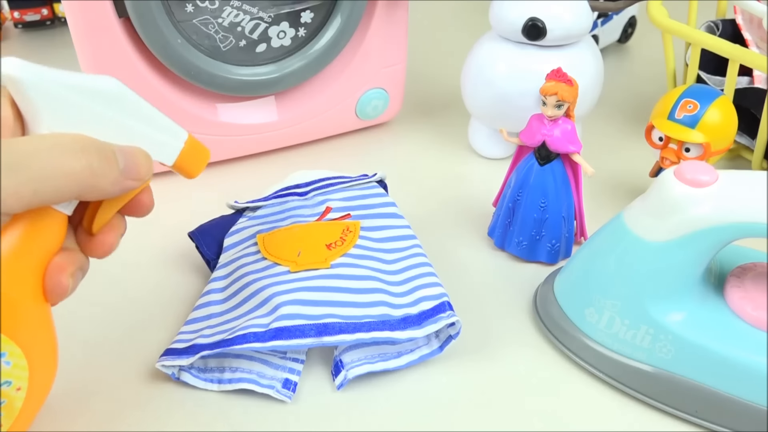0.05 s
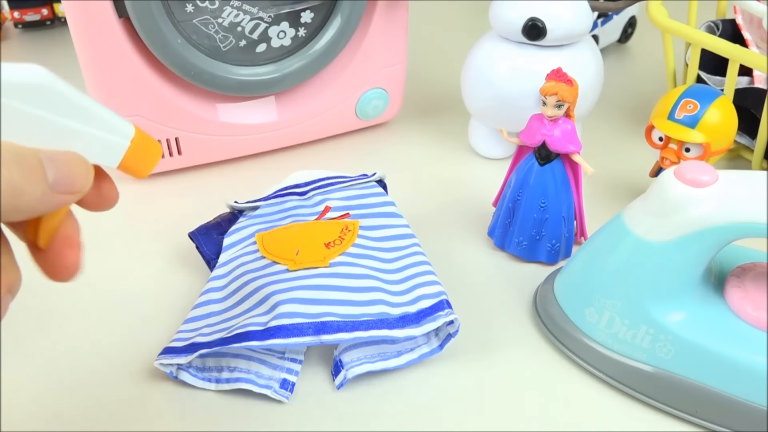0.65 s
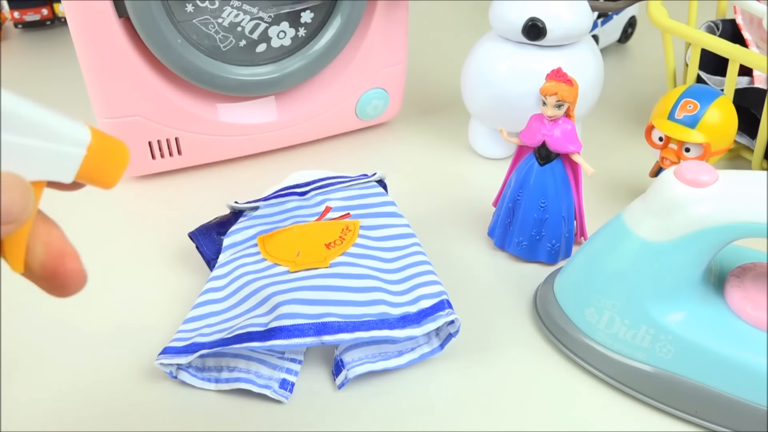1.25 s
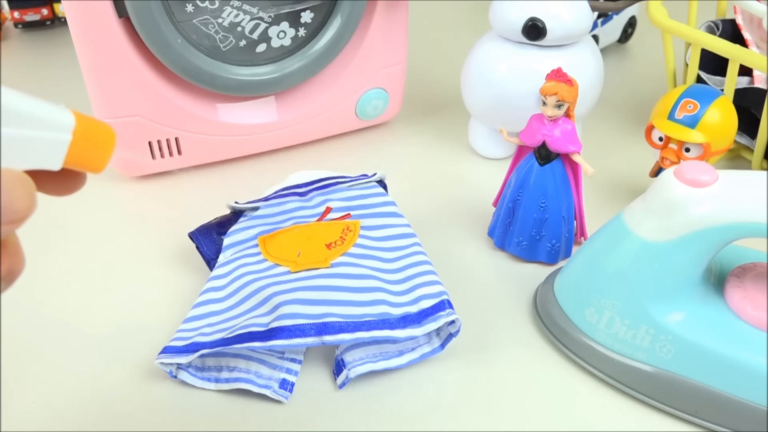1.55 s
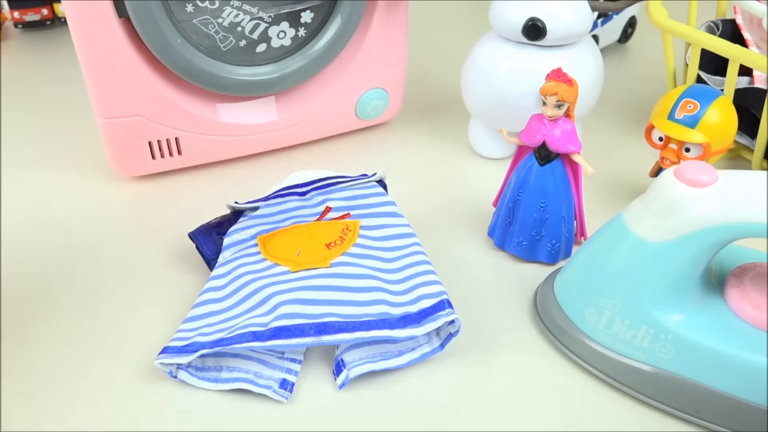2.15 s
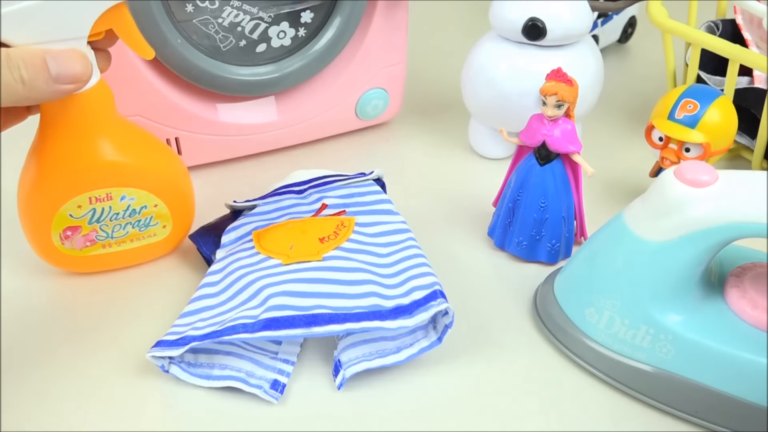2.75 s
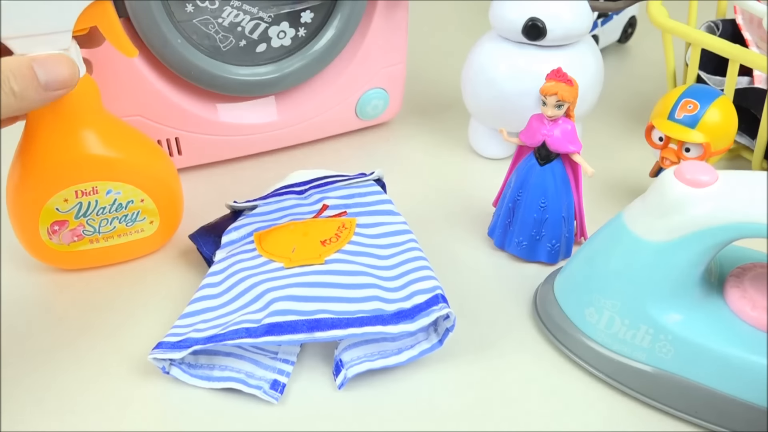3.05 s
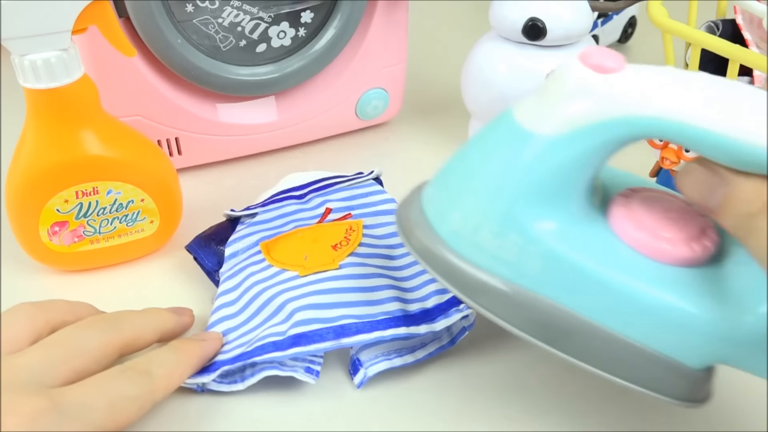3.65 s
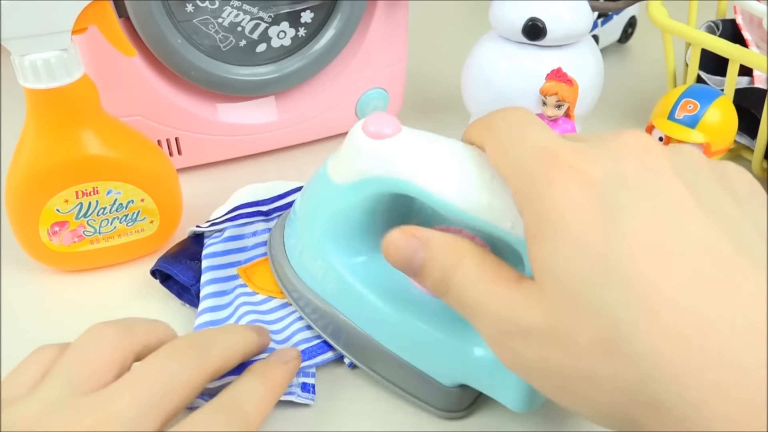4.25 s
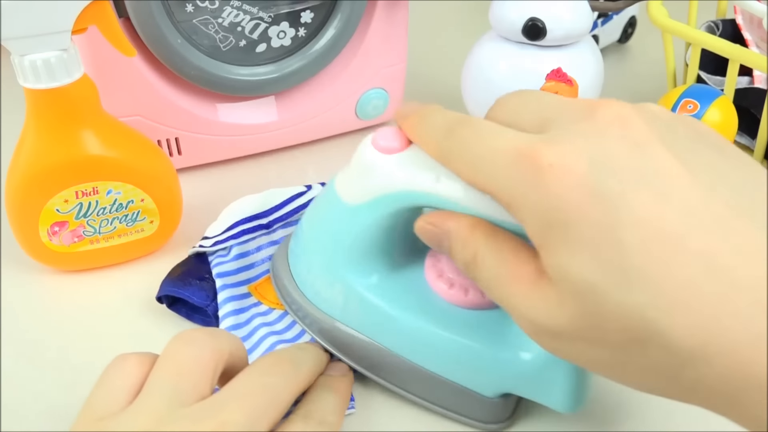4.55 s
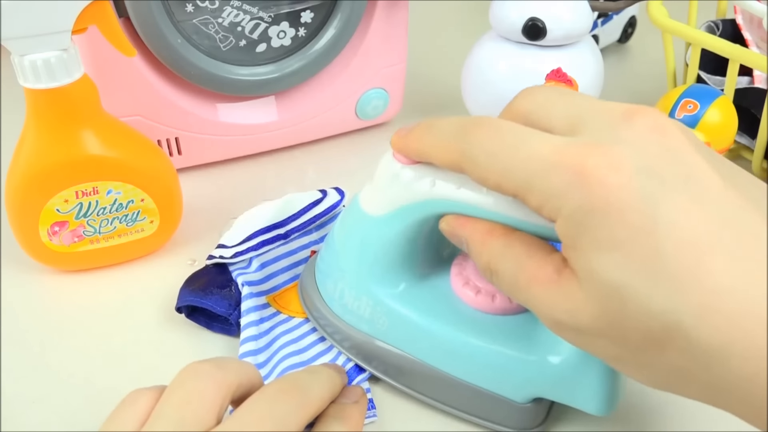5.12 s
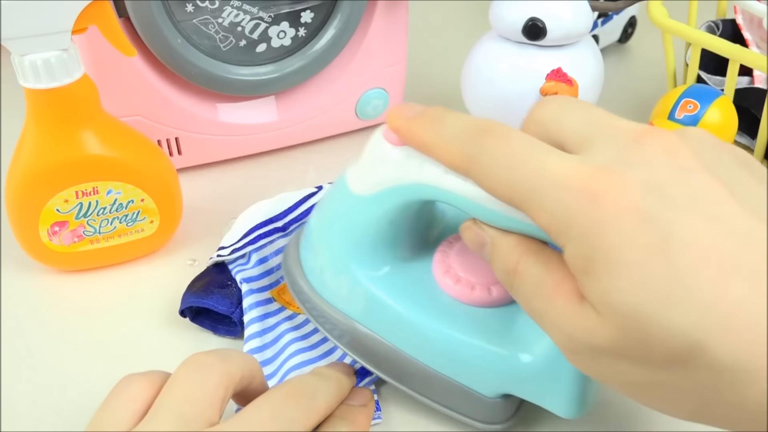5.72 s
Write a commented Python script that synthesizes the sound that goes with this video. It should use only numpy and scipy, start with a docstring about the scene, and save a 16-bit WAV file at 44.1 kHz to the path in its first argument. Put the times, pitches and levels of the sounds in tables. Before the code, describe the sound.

A toy spray bottle gives four short hissing squirts, its plastic trigger creaking and clicking back between them. After a pause the hollow bottle is set down with a knock. A plastic toy iron grazes the table, lands on cloth with another knock, then rubs forward and back with small clicks and a faint rustle. Everything is close to the microphone in a small, quiet room.

```python
"""A short hiss of air comes first: one of four squirts from a toy spray bottle, each a turbulent jet
coloured by the nozzle's resonances. Between them the trigger creaks and springs back, air is drawn in
and the valve ticks. The hollow bottle is set down; a plastic toy iron is lifted, knocked onto a doll's
shirt and pushed to and fro. Impacts ring the shells' modes; friction makes cloth and hands rustle.
All is heard close by, in stereo with dull treble, in a small room with a faint mains hum."""
import sys
import numpy as np
from scipy import signal
from scipy.fft import rfft, irfft
from scipy.io import wavfile
from scipy.ndimage import uniform_filter1d

SR = 44100
rng = np.random.default_rng(int(sys.argv[2]) if len(sys.argv) > 2 else 0)


def output_pcm(signal):
    """Save a mono or channel-first signal as 16-bit PCM at the path in sys.argv[1].

    Samples are clipped to [-1, 1] before scaling.
    """
    pcm = np.clip(np.atleast_2d(signal).T, -1, 1) * 32767
    wavfile.write(sys.argv[1], SR, np.round(pcm).astype(np.int16))


N = 254898
TIME = np.arange(N) / SR
SEAT_LEAD_S = .003  # a contact begins this long before its peak

# Levels in the tables are relative. Spectra give the level per unit bandwidth.
# steady room noise, and the lines of the mains hum: (frequency [Hz], level [dB])
AIR_SPECTRUM = [(12, -39), (20, -16), (27, -11.5), (59, -13), (75, -13.5), (140, -12.5), (274, -23),
                (510, -12.5), (644, -42), (714, -15), (856, -28.5), (1170, -21), (4730, -30.5), (9770, -63),
                (12700, -87), (21500, -120)]
HUM_LINES = [(150.7, -68), (247.6, -70), (301.5, -72), (349.9, -73.5), (500.6, -70), (699.8, -70),
             (1200, -72.5), (1400, -75)]
ROOM_DECAY = [(150, 1), (700, 0.48), (2000, 0.39), (5000, 0.19), (9000, 0.57)]  # reverberation time: (frequency [Hz], t60 [s])
ECHO_WIDTH = [(200, 0.17), (700, 0.19), (2000, 0.35), (5000, 0.21)]  # stereo spread of the echoes: (frequency [Hz], side over mid [ratio])

RUSTLE_SPECTRUM = [(59, -43), (100, -8), (155, -6), (178, -8), (242, -2), (383, -9.5), (618, -10),
                   (778, -11.5), (960, -10.5), (5190, -17.5), (6660, -26), (9770, -57), (12700, -71),
                   (21500, -120)]  # friction of hands and cloth: (frequency [Hz], level [dB])
HAND_GESTURES = [(-.1, 1.58, -55), (1.55, 2.2, -56.5), (2.5, 3.55, -58.5), (3.69, 4.04, -59),
                 (4.05, 4.2, -52)]  # hands and sleeves moving: (start [s], end [s], level [dB])
CLOTH_SHIFT = [(4.25, -58), (4.4, -53.5), (4.62, -45.5), (4.76, -53), (5.05, -57.5), (5.2, -55),
               (5.36, -60), (5.5, -47.5), (5.65, -55), (5.78, -60)]  # cloth shifting under the iron: (time [s], level [dB])
HEEL_SCRAPES = [(3.413, -47.5, 0.02), (3.459, -44.5, .013), (3.5, -47.5, 0.0072)]  # the iron grazes the table: (time [s], level [dB], swell time [s])
SOLE_RESONANCES = [(724, 150, 2), (1000, 34, 7), (1440, 50, 4), (5040, 350, 3)]  # peaks of the iron's sole: (frequency [Hz], width [Hz], lift [dB])
# the iron pushed over the cloth, then pulled back: (time [s], level [dB])
PUSH_ENVELOPE = [(4.59, -59), (4.602, -62), (4.62, -43.5), (4.684, -37), (4.698, -39), (4.712, -36.5),
                 (4.83, -56.5)]
PULL_ENVELOPE = [(5.41, -56), (5.434, -48.5), (5.456, -34.5), (5.492, -45), (5.536, -33.5), (5.544, -40),
                 (5.558, -32.5), (5.59, -56)]
# friction of the iron as it is lifted, pushed and pulled: (frequency [Hz], level [dB])
SCRAPE_SPECTRUM = [(100, -7), (300, 4.5), (1200, -3.5), (2300, 2), (3800, -0.5), (5500, -9), (6500, -16),
                   (8000, -31), (10000, -50)]
PUSH_SPECTRUM = [(59, -58), (100, -32), (228, -5.5), (282, -15), (510, -11), (720, -1.5), (840, -9.5),
                 (1100, -13), (1640, -5.5), (1920, -3.5), (2650, -7.5), (4200, -14), (4720, -21),
                 (5190, -16.5), (9770, -66), (12700, -90), (21500, -120)]
PULL_SPECTRUM = [(59, -39), (100, -21), (136, -11), (171, -18), (266, -4), (455, -16), (606, -2),
                 (793, -6.5), (998, -2), (1190, -6), (1460, -2), (2070, -7.5), (3470, -3.5), (6050, -27),
                 (9770, -64), (12700, -86), (21500, -120)]

# each toy's contact pulse and the dense ring of its shell: (frequency [Hz], level [dB])
BOTTLE_CONTACT = [(60, -32), (170, -11), (340, 0), (500, -2), (780, 7.5), (950, -2), (1250, -9),
                  (2200, -18), (3500, -16.5), (4500, -22.5), (6000, -50), (8000, -50), (10000, -75)]
BOTTLE_SHUDDER = [(60, -26), (170, -0.5), (350, 4.5), (550, 5), (800, -13), (1300, -4), (2200, -7),
                  (4500, -9.5), (6200, -17), (8000, -38), (10000, -56)]
IRON_CONTACT = [(60, -25), (200, -6), (360, -10.5), (570, 3), (850, -11), (1070, -1), (1380, -9),
                (1750, 1.5), (2450, -20), (2950, -7.5), (4900, -15.5), (6200, -28), (8000, -60),
                (10000, -81)]
IRON_SHUDDER = [(60, -30.5), (220, 3.5), (400, -4.5), (700, 6.5), (860, -3), (1040, 4), (1350, -8),
                (1750, 3), (2550, -6.5), (3000, -8), (5000, -5.5), (6200, -15), (8000, -41), (10000, -55)]
# each toy's normal modes: (frequency [Hz], level [dB], t60 [s])
BOTTLE_RING = [(820, 14.5, 0.14), (715, -18, .13), (402, -7, .1), (336, -3, .09), (202, -2, .12),
               (1430, -13, .16), (2120, -7, .16)]
IRON_RING = [(274, 0, 0.091), (607, -19, 0.062), (715, 9.5, 0.11), (960, -20, .12), (1620, -12, 0.14),
             (1795, 0, 0.23), (2130, -15, 0.21), (2960, -16, .13), (3800, -14, .13), (4834, -13, 0.127)]
CLICK_SPECTRUM = [(100, -13.5), (400, -16), (1000, -11.5), (2500, -8.5), (5000, -8), (6300, -12),
                  (7500, -22.5), (9000, -32.5), (10500, -53)]  # a snap of plastic: (frequency [Hz], level [dB])
# the iron's shell clicks under the hand, and the trigger creaks in its pivot:
# (time [s], level [dB], resonance [Hz], lift [dB], rattle share [dB])
SHELL_CLICKS = [(3.3879, -30.5, 1368, 6, -8), (3.4486, -21.5, 2000, 16, -12), (3.458, -35, 1990, 12, -8),
                (4.111, -29, 4800, 8, -7), (4.4089, -28, 4800, 4, -9), (4.505, -32, 3935, 8, -4),
                (4.65, -21, 1830, 21, -3), (5.0543, -31, 4500, 9, -18), (5.5305, -25.5, 3480, 25, 2)]
PIVOT_CREAKS = [(.155, -36, 3020, -7, -1), (0.181, -25.5, 2400, 13, -12), (.218, -19, 3100, 9, -14),
                (.963, -37, 2000, 15, -13), (1.3868, -31, 4560, 1, -8), (1.476, -25.5, 2030, 9, -9)]

# the valve snaps open before a squirt: (time [s], level [dB], resonance [Hz], lift [dB])
VALVE_SNAPS = [(.3595, -16, 2400, 7), (0.9195, -18, 5330, 15.5), (1.432, -17, 5600, 8)]
# the trigger springs back:
# (time [s], click level [dB], click resonance [Hz], air level [dB], valve resonance lift [dB])
TRIGGER_RETURNS = [(.758, -20, 2370, -40, 6.5), (1.278, -18.5, 4340, -38.5, 12),
                   (1.7574, -22, 4450, -41, 10)]
WALL_POPS = [(0.7724, -30.5), (1.777, -39)]  # the bottle wall flexes back: (time [s], level [dB])
# turbulence drawn in at the valve and blown out at the nozzle: (frequency [Hz], level [dB])
INTAKE_SPECTRUM = [(80, -15.5), (300, 3), (800, -6.5), (2100, 0.5), (3300, -7.5), (4700, -4), (6200, -11.5),
                   (8000, -44), (10000, -54)]
JET_SPECTRUM = [(60, -16), (160, -11.5), (420, -7.5), (700, -10.5), (1100, -8), (1700, -0.5), (2200, 2),
                (4200, -1), (5400, -5), (6300, -8.5), (7200, -19), (8300, -30), (9500, -39.5), (10500, -73)]
# pulls of the trigger: (start [s], attack [s], hand eases off [s], end [s], level [dB],
# swell while held [dB/s], brightness [dB/octave])
SQUEEZES = [(-.15, .02, 0.0031, 0.13, -33.5, 0, 0.5), (.362, 0.044, 0.58, .757, -33.5, 15.5, 2.5),
            (.953, 0.02, 1.1255, 1.277, -31, 5.5, 1.9), (1.469, 0.0064, 1.625, 1.757, -37, 3, 1)]
# nozzle resonances, one row a squirt: (low resonance [Hz], low lift [dB], middle lift [dB],
# valley lift [dB], top resonance [Hz], top lift [dB])
NOZZLE_RESONANCES = [(2030, 4.5, 3, -2, 4900, 4.5), (2120, 0, -1, 2, 5600, 5.5),
                     (2040, 4, 0.5, -5, 4700, 6), (2006, 8, 0.5, -4, 5320, 6.5)]


def amp(db):
    """The decibel law: amplitude grows tenfold every 20 dB."""
    return 10 ** (np.asarray(db) / 20)


def unit(x):
    """Power normalisation to rms 1."""
    return x / np.sqrt(np.mean(x ** 2) + 1e-20)


def read(points, hz):
    """Interpolation of a spectrum on a logarithmic frequency axis."""
    f, value = np.transpose(points)
    return np.interp(np.log(hz + 1), np.log(f + 1), value)


def shape_db(points, hz, peaks=()):
    """Resonance: peaks (frequency [Hz], width [Hz], lift [dB]) stand on a smooth spectrum."""
    return read(points, hz) + sum(lift / (1 + 2 * ((hz - f) / width) ** 2) ** 2 for f, width, lift in peaks)


def colour(x, points, peaks=()):
    """Source and filter: the excitation x takes on a spectrum, at rms 1."""
    hz = np.fft.rfftfreq(len(x), 1 / SR)
    return unit(irfft(rfft(x) * amp(shape_db(points, hz, peaks)), len(x)))


def grains(size, per_s, spread_db):
    """Shot noise: independent tiny impulses of uneven strength."""
    occurs = rng.random(size) < per_s / SR
    strength = amp(spread_db * np.minimum(rng.exponential(1, size), 4))
    return unit(occurs * rng.choice([-1, 1], size) * strength)


def rattle(t60):
    """Modal overlap: a dense response merges into exponentially dying noise, of energy 1."""
    t = np.arange(SR // 2) / SR
    tail = rng.standard_normal(len(t)) * amp(-60 * t / t60)
    return tail / np.linalg.norm(tail)


def ring(modes):
    """Free vibration: one damped sine for each normal mode."""
    t = np.arange(SR // 2) / SR
    return sum(amp(db - 60 * t / t60) * np.sin(2 * np.pi * hz * t) for hz, db, t60 in modes)


def add(mix, s, sound, pan_db):
    """Superposition: a sound joins the mix at time s, louder on the left by pan_db."""
    part = mix[:, max(round(s * SR), 0):][:, :len(sound)]
    part += amp([[pan_db / 2], [-pan_db / 2]]) * sound[:part.shape[1]]


def pair(mid, side, apart):
    """Partial coherence: two channels share mid and take side in opposite polarity."""
    return np.array([mid + apart * side, mid - apart * side]) / np.hypot(1, apart)


def background(air_db=-62, hum_gain_db=-1, pan_db=7.5):
    """Stationary sound: broadband room noise under the line spectrum of mains hum."""
    air = pair(*[colour(rng.standard_normal(N), AIR_SPECTRUM) for _ in range(2)], apart=0.36)
    hum = sum(amp(db) * np.sin(2 * np.pi * (hz * TIME + rng.random())) for hz, db in HUM_LINES)
    return (amp(air_db) * air + amp(hum_gain_db) * hum) * amp([[pan_db / 2], [-pan_db / 2]])


def room(x, wet_db, first_s=0.016, early=0.61):
    """Reverberation: weak early reflections, then a tail in which absorption spares the bass longest."""
    t = np.arange(SR // 2) / SR
    build_up = np.interp(t, [.001, first_s, first_s + 0.0019], [early / 2, early, 1])
    reflections = rng.choice([-1, 1], (2, len(t))) * (rng.random((2, len(t))) < .15) * build_up
    hz, at, bands = signal.stft(reflections, SR, nperseg=256)
    decay = amp(-60 * at / read(ROOM_DECAY, hz)[:, None])
    bands = pair(*bands, read(ECHO_WIDTH, hz)[:, None]) * decay
    tail = signal.istft(bands, SR, nperseg=256)[1]
    return amp(wet_db) * signal.fftconvolve(x, tail / np.linalg.norm(tail[0]), axes=1)[:, :N]


def scatter(x, side_db, centre_hz, octaves=1.1, t60=.015):
    """Scattering: toys standing left and right throw the upper mids back sideways."""
    bounces = np.pad(rattle(t60), (SR // 400, 0))  # the detour takes 2.5 ms
    side = signal.fftconvolve(x.mean(0), bounces)[:N]
    hz = np.fft.rfftfreq(N, 1 / SR)
    band = np.exp(-.5 * (np.log2((hz + 1) / centre_hz) / octaves) ** 2)
    return amp(side_db) * irfft(rfft(side) * band, N) * np.array([[1], [-1]])


def rustle(fade_s=.13, rest_db=-63):
    """Incoherent addition: the friction of hands and cloth, never quite still, sums in power."""
    moves = [amp(db) * np.clip(np.minimum(TIME - start, end - TIME) / fade_s + .5, 0, 1)
             for start, end, db in HAND_GESTURES]
    cloth = amp(np.interp(TIME, *np.transpose(CLOTH_SHIFT), left=-np.inf))
    gain = np.sqrt(amp(rest_db) ** 2 + cloth ** 2 + np.sum(np.square(moves), 0))
    return gain * colour(grains(N, per_s=9000, spread_db=1.3), RUSTLE_SPECTRUM)


def scrape(s, level_db, swell_s):
    """Sliding friction: the iron's heel grazes the table and excites the sole's resonances."""
    t = np.arange(-SR // 10, SR // 10) / SR
    friction = colour(grains(len(t), per_s=2500, spread_db=.6), SCRAPE_SPECTRUM, SOLE_RESONANCES)
    return s + t[0], amp(level_db) * friction * np.exp(-.5 * (t / swell_s) ** 2)


def stroke(envelope, spectrum, gain_db, glide_hz, width_hz, ring_db, pressed_at, press_s, slips_per_s):
    """Stick-slip friction: threads excite the sole; a gliding resonance sings under the hardest press."""
    times, levels_db = np.transpose(envelope)
    t = np.arange(times[0], times[-1], 1 / SR)
    rub = colour(grains(len(t), slips_per_s, spread_db=-0.5), spectrum, SOLE_RESONANCES)
    # a low-pass that turns with the carrier acts as a moving resonator
    carrier = np.exp(2j * np.pi * np.cumsum(np.linspace(*glide_hz, len(t))) / SR)
    pole = np.exp(-np.pi * width_hz / SR)
    sung = unit((carrier * signal.lfilter([1 - pole], [1, -pole], rub / carrier)).real)
    press = np.exp(-.5 * ((t - pressed_at) / press_s) ** 2)
    gain = amp(np.interp(t, times, levels_db) + gain_db)
    return t[0], gain * (rub + amp(ring_db) * press * sung)


def wall_response(points, peaks=(), lag_s=0.000527, size=2048):
    """Dispersion: bending waves in a struck plastic wall bring the low notes later; peak 1."""
    hz = np.fft.fftfreq(size, 1 / SR)
    log_gain = np.log(amp(shape_db(points, abs(hz), peaks)))
    log_minimum_phase = np.conj(signal.hilbert(log_gain))
    bending = 4 * np.pi * lag_s * np.sign(hz) * np.sqrt(1000 * abs(hz))  # delay of lag_s at 1 kHz
    pulse = np.fft.ifft(np.exp(log_minimum_phase - 1j * bending)).real[:size // 2]
    return pulse / abs(pulse).max()


def seating(crunch_db, t60):
    """Phase spreading: as parts seat, a contact lasts a few ms while its spectrum stays flat."""
    drive = amp(crunch_db) * rattle(t60)
    drive[0] = 1
    flat = irfft(np.exp(1j * np.angle(rfft(drive))), len(drive))
    return np.roll(flat, round(SEAT_LEAD_S * SR))


def knock(contact, shell, modes, contact_db, shell_db, modes_db, t60):
    """Impact on a hollow toy: a contact pulse, a shuddering shell and ringing normal modes."""
    shudder = signal.fftconvolve(rattle(t60), wall_response(shell))[:SR // 2]
    pulse = wall_response(contact)
    pulse = np.pad(pulse, (0, len(shudder) - len(pulse)))
    return amp(contact_db) * pulse + amp(shell_db) * shudder + amp(modes_db) * ring(modes)


def click(hz, lift_db, rattle_db, edge_hz):
    """Impulsive excitation: plastic snaps and rattles; a softer contact has a lower treble edge."""
    crunch = seating(crunch_db=1, t60=0.0048)[:SR // 10]
    shudder = np.pad(rattle(t60=0.056), (round(SEAT_LEAD_S * SR), 0))[:SR // 10]
    softened = [(f, db - 10 * np.log10(1 + (f / edge_hz) ** 6)) for f, db in CLICK_SPECTRUM]
    wall = wall_response(softened, [(hz, 0.37 * hz, lift_db)], lag_s=0.00067)
    return signal.fftconvolve(crunch + amp(rattle_db) * shudder, wall)


def flex(hz=303, pop_t60=0.065, air_db=-6.5, air_t60=.11, rise_s=.004):
    """Cavity resonance: the bottle wall pops back and the air inside hums briefly."""
    hum = ring([(hz, 0, pop_t60), (hz, air_db, air_t60)])
    return hum * np.minimum(TIME[:len(hum)] / rise_s, 1)


def intake(s, level_db, swell_s, hz, lift_db, width_hz=480):
    """Suction: air splutters in through the valve and excites its resonance."""
    t = np.arange(-SR // 10, SR // 10) / SR
    splutter = grains(len(t), per_s=2500, spread_db=2.1)
    air = colour(splutter, INTAKE_SPECTRUM, [(hz, width_hz, lift_db)])
    return s + t[0], amp(level_db) * air * np.exp(-.5 * (t / swell_s) ** 2)


def squeeze(start, attack_s, ease, end, level_db, swell_db_per_s, tilt_db):
    """Atomisation: pressure builds, holds and runs out; the jet is brightest as a fine mist."""
    release_s, release_db, dribble_db = .11, -12, -14
    mist_s, coarsen_lead_s, coarsen_s, drops_db_per_octave = 0.025, 0.023, 0.14, -5
    t = np.arange(max(start, 0), end, 1 / SR)
    attack = np.clip((t - start) / attack_s, 0, 1)
    held_db = swell_db_per_s * np.minimum(t - ease, 0)
    spent = np.maximum(t - ease, 0) / release_s
    gain = attack * amp(level_db + held_db + np.maximum(release_db * spent ** 2, dribble_db))
    # coarse drops dull the hiss before the jet breaks up and again as the pressure goes
    first_drops = np.exp(-(t - start) / mist_s)
    last_drops = np.clip((t - ease + coarsen_lead_s) / coarsen_s, 0, 1)
    return t, gain, tilt_db + drops_db_per_octave * (first_drops + last_drops)


def squirt(pull, nozzle, flutter=0.014):
    """Jet noise: turbulence excites the nozzle's resonances and brightens with the squeeze."""
    t, gain, tilt_db = squeeze(*pull)
    low_hz, low_db, middle_db, valley_db, top_hz, top_db = nozzle
    peaks = [(1720, 300, -.45 * low_db),  # an antiresonance steepens the lowest peak's foot
             (low_hz, 350, low_db), (2750, 650, middle_db), (3620, 650, valley_db), (top_hz, 780, top_db)]
    turbulence = colour(rng.standard_normal(len(t)), JET_SPECTRUM, peaks)
    hz, at, bands = signal.stft(turbulence, SR, nperseg=256)
    octaves = np.log2(np.clip(hz, 1000, 8000) / 2900)
    tilt = amp(octaves[:, None] * np.interp(at + t[0], t, tilt_db))
    jet = signal.istft(bands * tilt, SR, nperseg=256)[1][:len(t)]
    eddies = 1 + flutter * unit(uniform_filter1d(rng.standard_normal(len(t)), size=150))
    return t[0], jet * eddies * gain


def scene():
    """Superposition of direct and reflected sound: spraying, setting the bottle down, ironing."""
    hiss, handling, knocks, ironing = np.zeros((4, 2, N))
    for pull, nozzle in zip(SQUEEZES, NOZZLE_RESONANCES):
        add(hiss, *squirt(pull, nozzle), pan_db=2)
    for s, db, hz, lift_db in VALVE_SNAPS:
        tick = click(hz, lift_db, rattle_db=-17, edge_hz=11000)
        add(handling, s - SEAT_LEAD_S, amp(db) * tick, pan_db=3.5)
    for s, db, *tone in PIVOT_CREAKS:
        add(handling, s - SEAT_LEAD_S, amp(db) * click(*tone, edge_hz=7300), pan_db=3.5)
    # the trigger's first return is slow, with no snap
    add(handling, *intake(0.19, level_db=-44, swell_s=0.027, hz=2960, lift_db=11), pan_db=4)
    for s, click_db, hz, air_db, valve_db in TRIGGER_RETURNS:
        snap = click(hz, lift_db=6, rattle_db=-2.5, edge_hz=5300)
        add(handling, s - SEAT_LEAD_S, amp(click_db) * snap, pan_db=3.5)
        add(handling, *intake(s + .019, air_db, swell_s=0.017, hz=1510, lift_db=valve_db), pan_db=3)
    for s, db in WALL_POPS:
        add(handling, s, amp(db) * flex(), pan_db=4)

    for s, db, *tone in SHELL_CLICKS:
        add(handling, s - SEAT_LEAD_S, amp(db) * click(*tone, edge_hz=4700), pan_db=3)
    for graze in HEEL_SCRAPES:
        add(ironing, *scrape(*graze), pan_db=4)
    bottle = knock(BOTTLE_CONTACT, BOTTLE_SHUDDER, BOTTLE_RING,
                   contact_db=-15.5, shell_db=-25.5, modes_db=-52.5, t60=0.2)
    add(knocks, 2.8516, bottle, pan_db=4.5)
    iron = knock(IRON_CONTACT, IRON_SHUDDER, IRON_RING,
                 contact_db=-12, shell_db=-14, modes_db=-38, t60=0.23)
    landing = signal.fftconvolve(iron, seating(crunch_db=0, t60=.008)[:SR // 50])
    add(knocks, 4.1915 - SEAT_LEAD_S, landing, pan_db=2.5)
    forward = stroke(PUSH_ENVELOPE, PUSH_SPECTRUM, gain_db=3.5, glide_hz=(1660, 1980), width_hz=380,
                     ring_db=2.5, pressed_at=4.74, press_s=0.028, slips_per_s=4000)
    add(ironing, *forward, pan_db=1.4)
    back = stroke(PULL_ENVELOPE, PULL_SPECTRUM, gain_db=-3.5, glide_hz=(3480, 3330), width_hz=500,
                  ring_db=-6, pressed_at=5.53, press_s=0.045, slips_per_s=2200)
    add(ironing, *back, pan_db=1.5)
    add(hiss, 0, rustle(), pan_db=4.5)

    echoes = room(hiss + ironing, wet_db=-10) + room(handling, wet_db=-8) + room(knocks, wet_db=-11)
    sideways = (scatter(hiss + handling, side_db=-14, centre_hz=3300)
                + scatter(ironing, side_db=-10.5, centre_hz=3000)
                + scatter(knocks, side_db=-22, centre_hz=2500))
    return hiss + handling + knocks + ironing + sideways + echoes + background()


def record(dry):
    """Band limiting: a steep low-pass dulls the treble, and a small constant offset is added."""
    edge_hz, offset = 9950, .0014
    low_pass = signal.firwin(511, edge_hz, window=("kaiser", 9), fs=SR)
    return signal.oaconvolve(dry, low_pass[None], "same", axes=1) + offset


dry = scene()
out = record(dry)
output_pcm(out)
```